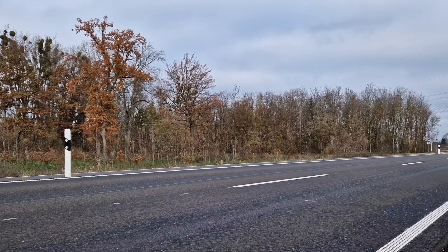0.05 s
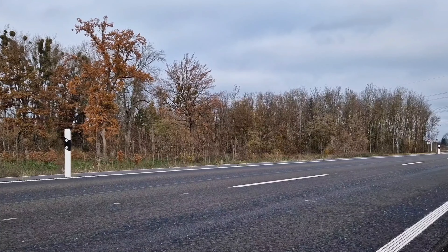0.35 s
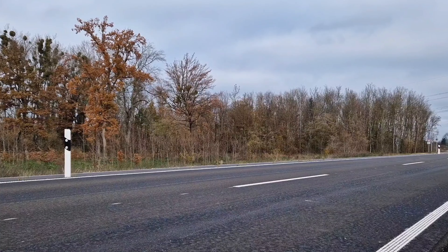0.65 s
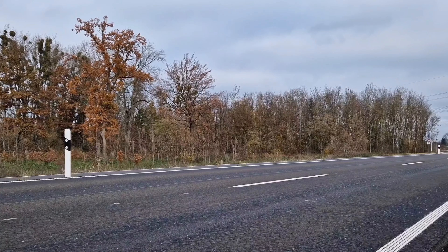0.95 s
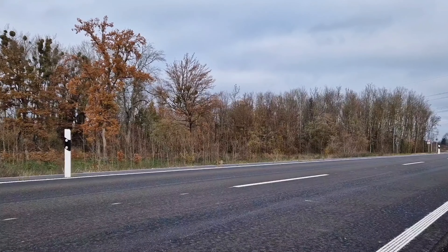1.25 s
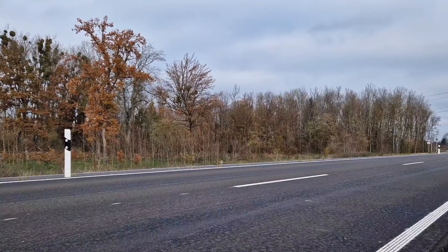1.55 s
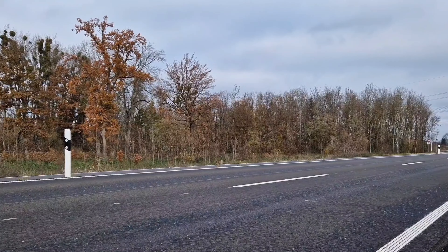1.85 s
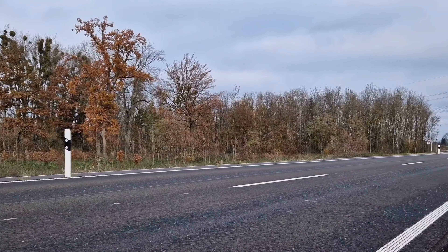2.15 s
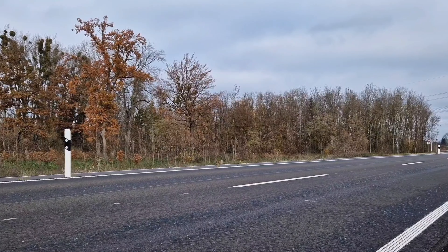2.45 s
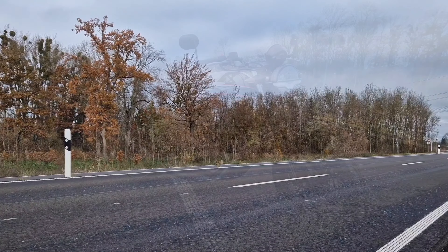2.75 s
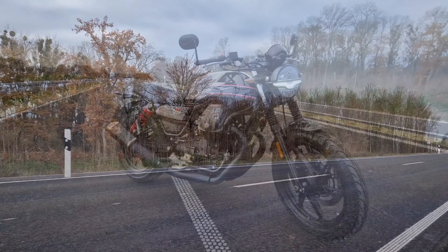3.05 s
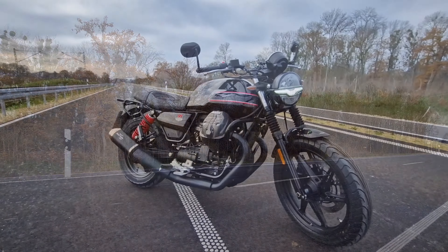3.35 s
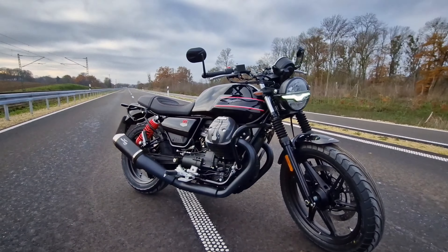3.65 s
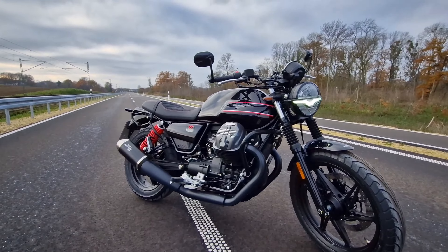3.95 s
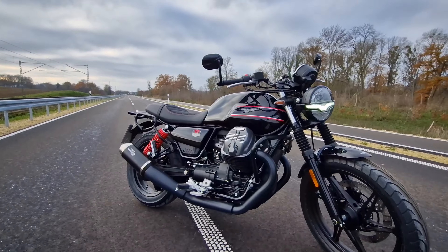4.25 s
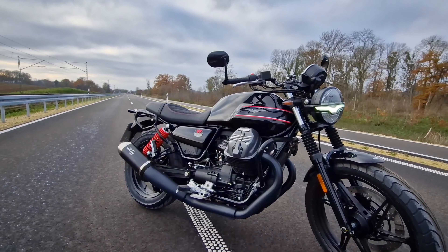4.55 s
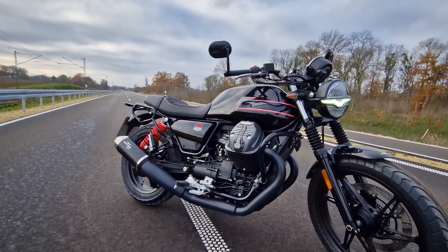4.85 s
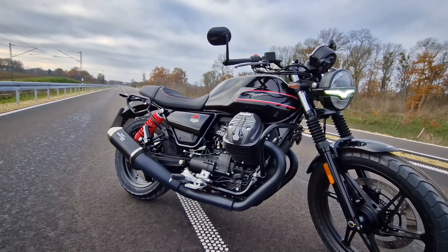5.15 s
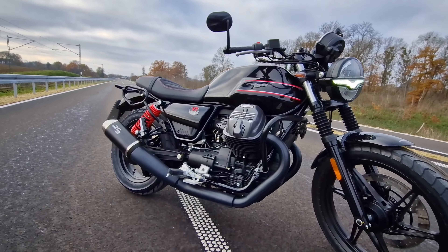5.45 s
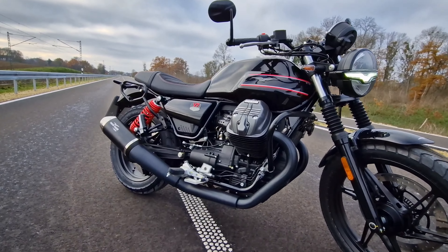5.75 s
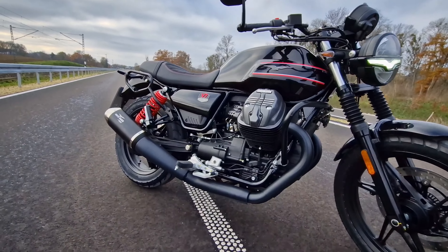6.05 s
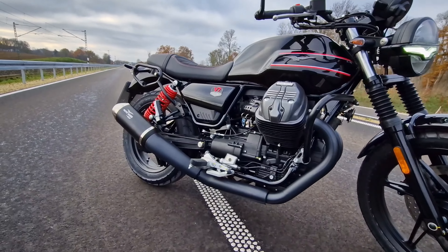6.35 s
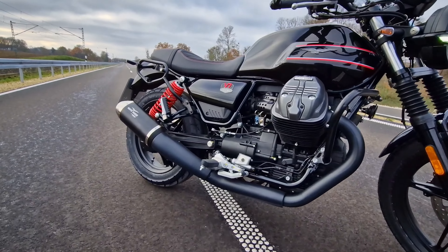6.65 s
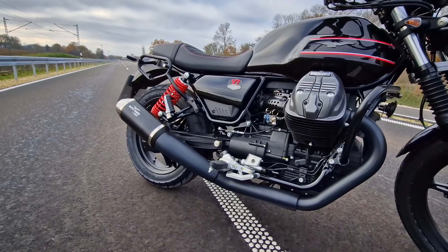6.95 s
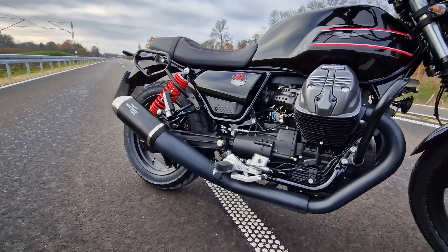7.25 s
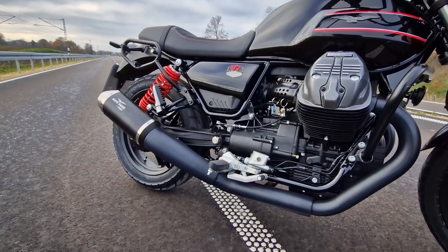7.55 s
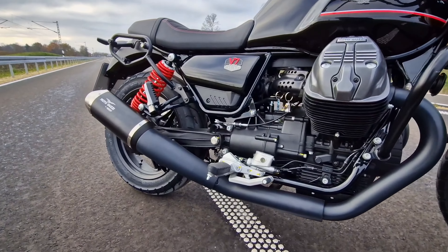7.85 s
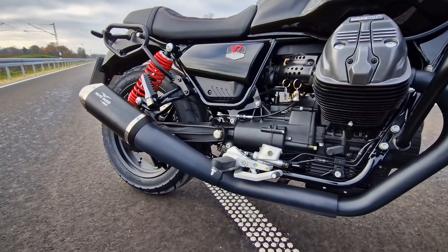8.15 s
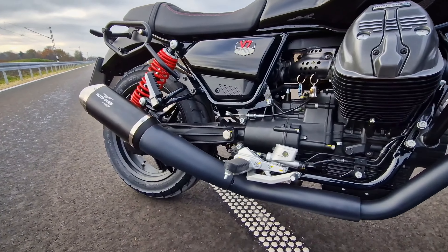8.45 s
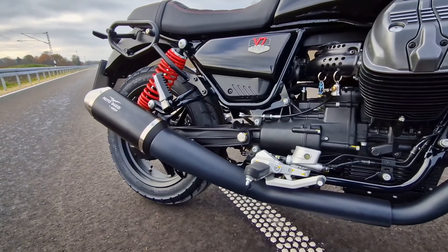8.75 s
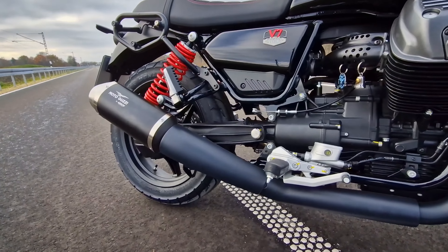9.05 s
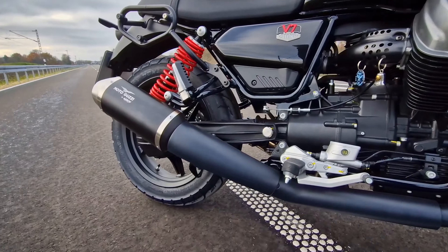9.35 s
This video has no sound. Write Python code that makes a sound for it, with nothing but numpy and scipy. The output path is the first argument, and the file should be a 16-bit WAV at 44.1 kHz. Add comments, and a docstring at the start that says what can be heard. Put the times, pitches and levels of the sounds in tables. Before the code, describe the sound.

A V-twin motorcycle fades down the road, its exhaust popping, then idles unevenly, growing nearer, with ticking valves and a few sharp knocks.

```python
"""A V-twin motorcycle has just passed on an open road. Engine tones and gear whine sink with the revs;
from 0.7 s the exhaust pops, fading into the distance with its burble, tyre rush and valve ticks.
From 3.3 s it idles close by, coming nearer: gas puffs ring the silencer, soon loping strong and weak,
valve and piston strikes ring the engine metal in step with the crank, and a gear whine wavers on top.
A few sharp knocks come near the end."""
import sys
import numpy as np
from scipy import signal
from scipy.fft import rfft, irfft, next_fast_len
from scipy.io import wavfile
from scipy.ndimage import uniform_filter1d

SR = 44100
rng = np.random.default_rng(int(sys.argv[2]) if len(sys.argv) > 2 else 0)


def file_out(sig):
    """Save sig as 16-bit WAV at sys.argv[1]."""
    # one column per channel
    cols = np.atleast_2d(sig).T
    # limit, then scale
    lim = np.clip(cols, -1, 1)
    pcm = np.round(lim * 32767).astype(np.int16)
    wavfile.write(sys.argv[1], SR, pcm)


N = 414099
TIME, HZ = np.arange(N) / SR, np.fft.rfftfreq(next_fast_len(N, real=True), 1 / SR)

# Levels in the tables are relative; each source adds its own offset.
# stereo image of the noise: (frequency [Hz], left-right likeness [0-1])
COHERENCE = [(30, 0.76), (200, 0.6), (550, 0.86), (1100, 0.85), (2200, 0.19), (4500, 0.041), (12000, 0.085)]
# (frequency [Hz], phase lead of the left side [rad])
LEFT_LEAD = [(500, 0), (1000, -1.2), (2200, -0.83), (4500, -7.5), (12000, -13.5)]

# riding away: (time [s], rumble [dB], tyre and engine rush [dB], its treble [dB])
AWAY_LEVELS = [(0, -46, -52.5, -58), (0.77, -56, -60, -76.5), (2.57, -68.5, -77.5, -92.5),
               (3.2, -82, -96, -102)]
# tyre and engine rush: (frequency [Hz], density [dB])
RUSH_SPECTRUM = [(150, -25), (250, 1), (359, -5), (593, -16), (837, -19), (1180, -21.5), (1920, -21.5),
                 (3330, -23.5), (4470, -43), (6210, -41), (7510, -30.5), (9390, -34), (15500, -47.5)]
# engine metal from behind: (frequency [Hz], width [Hz], peak [dB])
FAR_METAL_MODES = [(1180, 140, 3.5), (2650, 460, 1.5), (3350, 270, 2.5), (5500, 1000, 8), (7960, 400, 2)]
# falling revs: (time [s], engine cycle rate [Hz])
COAST_REVS = [(0, 15.8), (.2, 14.9), (.4, 13.2), (.6, 11.5), (.8, 10.3), (1, 9.4), (1.3, 9.5)]
# coasting tones: (order [per cycle], level [dB], fall [dB/s])
ENGINE_ORDERS = [(2, -30, 20), (3, -42, 17), (4, -21.5, 22), (6, -20, 38), (7, -41, 12), (8, -33.5, 25),
                 (10, -40.5, -10.5)]
# burble between the pops: (time [s], level [dB])
BURBLE_LEVEL = [(0, -27.5), (.5, -29.5), (1, -34.5), (1.8, -43), (2.4, -44.5), (2.8, -50), (3.2, -57)]
# exhaust pops: (time [s], level [dB])
POP_LEVELS = [(.72, -27), (.93, -33), (1.03, -22), (1.35, -20.5), (1.95, -24), (2.36, -27), (2.76, -35.5),
              (3.2, -46)]
# missed firing: (time [s], loss [dB])
MISFIRE_LOSS = [(1.8, -0.5), (2.25, 11)]

# idling, coming nearer: (time [s], clatter [dB], its treble [dB], fins [dB], exhaust [dB])
IDLE_LEVELS = [(3.4, -61.5, -63.5, -63.5, -37.5), (3.93, -49.5, -50.5, -50.5, -26),
               (5.29, -40, -42, -40.5, -17), (9.21, -39, -38.5, -40, -17), (9.36, -39.5, -40, -39.5, -17)]
# hunting idle speed: (time [s], engine cycle rate [Hz])
IDLE_RATE = [(3.3, 10.631), (4.3, 10.989), (4.9, 10.726), (5.4, 10.66), (6.2, 11.249), (6.9, 10.867),
             (7.4, 10.662), (7.8, 11.452), (8.7, 10.728), (9.39, 10.67)]
# strong-weak alternation: (time [s], depth [0-1])
LOPE_DEPTH = [(4.2, .3), (5.2, 1)]
# broad colour of the engine: (frequency [Hz], density [dB])
CASE_SPECTRUM = [(310, -5.5), (520, -1), (1070, -5), (1200, -4), (1720, -7), (2630, -6), (3210, -8.5),
                 (3500, -4.5), (3980, -12.5), (14500, -14), (15600, -18.5)]
# crankcase, fins and valve covers: (frequency [Hz], width [Hz], peak [dB])
METAL_MODES = [(710, 41, 4.5), (825, 28, 3.5), (1215, 79, 4), (2370, 68, -2), (2613, 17, 6),
               (2840, 310, 4.5), (3534, 61, 3), (4226, 77, 6), (5715, 140, 6), (7920, 870, 4.5),
               (10160, 74, 2.5), (11434, 130, -1.5)]
# valve and piston strikes: (phase [cycles], level [dB], brightness [dB], decay [s])
CYCLE_STRIKES = [(.02, -6, -7.5, 0.0025), (.16, 3.5, 1.5, 0.0035), (0.261, 5, -10.5, 0.022),
                 (0.699, 0.5, 5, 0.012), (.81, 4.5, -11, .011), (0.929, 3.5, 1.5, 0.0078)]
# gearbox and engine knocks: (time [s], level [dB], centre [Hz], half-width [factor])
KNOCK_EVENTS = [(0.175, -43, 1680, 1.7), (.339, -53, 3300, 1.5), (7.803, -30, 10400, 1.7),
                (8.249, -26, 3470, 0.98), (8.71, -28, 3570, 1.06), (8.797, -22.5, 7000, 2.6)]
# silencer and pipe, before pitch and damping factors: (frequency [Hz], width [Hz], level [dB])
PIPE_MODES = [(78.1, 17, -9), (99.1, 9.17, -1.5), (65.3, 8.6, -8), (166, 76, -11.5)]

POP_START_S, POP_RATE_HZ = .724, 9.8
LATE_BURN_S = 0.0113  # delay of the charge that burns in the pipe


def gain_of(db):
    """Decibels to amplitude."""
    return 10 ** (np.asarray(db) / 20)


def unit_rms(x):
    """Scale to rms 1."""
    return x / np.sqrt(np.mean(x ** 2) + 1e-20)


def spectrum(points):
    """A spectrum table at every frequency."""
    hz, value = np.transpose(points)
    return np.interp(np.log(HZ + 1), np.log(hz + 1), value)


def curves(rows):
    """The columns of a time table at every sample."""
    s, *columns = np.transpose(rows)
    return [np.interp(TIME, s, c) for c in columns]


def at_times(points, s):
    """A two-column time table at the given moments."""
    return np.interp(s, *np.transpose(points))


def drift(hz):
    """Slow random wander up to the given rate, rms 1."""
    count = N // 64
    lowpass = 1 + (np.fft.rfftfreq(count, TIME[-1] / count) / hz) ** 4
    slow = irfft(rfft(rng.standard_normal(count)) / lowpass, count)
    return np.interp(TIME, np.linspace(0, TIME[-1], count), unit_rms(slow))


def clicks(s, size):
    """Impulse train."""
    return np.bincount(np.clip(np.round(s * SR).astype(int), 0, N - 1), size, N)


def bursts(s, size, decay_s):
    """Power envelope: instant attack, exponential decay."""
    return signal.lfilter([1], [1, -np.exp(-2 / (decay_s * SR))], clicks(s, size ** 2))


def band(lo_hz, hi_hz):
    """Gain of a steep high-pass times a steep low-pass."""
    return 1 / np.sqrt((1 + (lo_hz / (HZ + 1)) ** 12) * (1 + (HZ / hi_hz) ** 12))


def peaks_db(modes):
    """Resonance peaks at every frequency."""
    return sum(db / (1 + (2 * (HZ - hz) / width_hz) ** 2) for hz, width_hz, db in modes)


def ripple(spacing_hz, depth_db):
    """Gain of many small, close casing modes."""
    grid = np.arange(0, SR, spacing_hz)
    return gain_of(depth_db * np.interp(HZ, grid, rng.standard_normal(SR)[:len(grid)]))


def hiss(colour, gate=1):
    """Stereo noise, gated, then coloured; rms 1."""
    size = next_fast_len(N, real=True)
    white = rng.standard_normal((2, N), dtype=np.float32)
    left, other = rfft((white * gate).astype(np.float32), size)
    same = np.clip(spectrum(COHERENCE), 0, 1)
    right = (same * left + np.sqrt(1 - same ** 2) * other) * np.exp(-1j * spectrum(LEFT_LEAD))
    return unit_rms(irfft(np.array([left, right]) * colour, size)[:, :N])


def shimmer(x, depth_db):
    """Each rattle favours other modes: narrow patches of the spectrum swell and fade."""
    frames = signal.stft(x, nperseg=512, noverlap=384)[2]
    patches = uniform_filter1d(rng.standard_normal(frames.shape[1:]), size=3, axis=0)
    patches = unit_rms(uniform_filter1d(patches, size=8, axis=1))
    gain = unit_rms(gain_of(depth_db * np.minimum(patches, 2)))
    return signal.istft(frames * gain, nperseg=512, noverlap=384)[1][:, :N]


def ground_echo(x, delay_s, share):
    """The asphalt returns a copy whose delay changes with distance."""
    echo = np.array([np.interp(TIME - delay_s, TIME, side) for side in x])
    return (x + share * echo) / np.sqrt(1 + share ** 2)


def road(pop_s, pop_db, lazy):
    """Tyre rush, engine rasp and rumble, dulled by distance; a light tick at each crisp pop."""
    rumble_db, rush_db, treble_db = curves(AWAY_LEVELS)
    rate_hz, = curves(COAST_REVS)
    rasp = gain_of(1.5 * np.sin(8 * np.pi * np.cumsum(rate_hz) / SR) + 1.1 * drift(70))
    colour = gain_of(spectrum(RUSH_SPECTRUM) + peaks_db(FAR_METAL_MODES))
    dulled_db = np.interp(TIME, [1.2, 2], [-4, -10])
    rush = (gain_of(rumble_db - 3) * hiss(colour * band(170, 850))
            + gain_of(rush_db - 1.5) * hiss(colour * band(580, 2870), rasp)
            + gain_of(rush_db + dulled_db) * hiss(colour * band(3000, 5000), rasp)
            + gain_of(treble_db + 2.5) * hiss(colour * band(4400, 16000), rasp))
    tick_power = bursts(pop_s + 0.0014, gain_of(0.62 * pop_db - 49 - 10 * lazy), decay_s=0.0096)
    ticks = np.sqrt(tick_power) * hiss(band(700, 3000) + band(5600, 6800) ** 3)
    rush = shimmer(ground_echo(rush, 0.000434 / (1 + 1.07 * TIME), share=0.18), depth_db=2.5)
    return rush + ticks + gain_of(rumble_db + 8.5) * hiss(band(16, 91))


def far_chatter():
    """The receding valve gear ticks unevenly in two bands of ringing metal."""
    cycle = np.arange(3, 24)
    s = np.concatenate([POP_START_S + (cycle + phase) / POP_RATE_HZ for phase, *_ in CYCLE_STRIKES])
    db = at_times(POP_LEVELS, s)[:, None] + 3.5 * rng.standard_normal((len(s), 2))
    fins = np.sqrt(bursts(s, gain_of(db[:, 0] - 50), decay_s=.016)) * hiss(band(2350, 2500))
    covers = np.sqrt(bursts(s, gain_of(db[:, 1] - 51), decay_s=.009)) * hiss(band(5500, 4600) ** 2)
    return fins + covers


def knocks():
    """Short clacks and pings of gearbox and engine."""
    return sum(np.sqrt(bursts(np.array([s]), gain_of([db]), decay_s=0.0081))
               * hiss(band(hz / wide, hz * wide)) for s, db, hz, wide in KNOCK_EVENTS)


def coasting_engine():
    """Engine orders and gear whine sink with the revs, gone by 1.2 s."""
    rate_hz, = curves(COAST_REVS)
    cycles = np.cumsum(rate_hz * (1 + 0.0084 * drift(18))) / SR
    tones = sum(gain_of(db - fall * TIME + 2 * drift(2.5))
                * np.sin(2 * np.pi * (order * cycles + rng.random()))
                for order, db, fall in ENGINE_ORDERS)
    whine_db = -58 - 2.4 * TIME + 2 * drift(25)
    whine = gain_of(whine_db) * np.sin(2 * np.pi * (41.5 * cycles + 0.11 * drift(30)))
    return (tones + whine) * np.interp(TIME, [.95, 1.2], [1, 0])


def silencer(train, pitch, puff_s, damping, highpass_hz):
    """Each gas puff rings the pipe modes; pitch < 1 lowers and slows the response."""
    t = np.arange(SR // 3) / SR * pitch
    ring = sum(gain_of(db) * np.exp(-np.pi * width_hz * damping * t) * np.cos(2 * np.pi * hz * t)
               for hz, width_hz, db in PIPE_MODES)
    thump = signal.fftconvolve(ring, t * np.exp(-t / puff_s))[:len(t)]
    thump = signal.sosfilt(signal.butter(2, highpass_hz, "high", fs=SR, output="sos"), thump)
    return -signal.oaconvolve(train, thump / abs(thump).max())[:N]


def burble():
    """Two exhaust strokes a cycle ring the receding silencer, Doppler-lowered."""
    level_db, = curves(BURBLE_LEVEL)
    stroke_s = POP_START_S + np.arange(-14, 49) / (2 * POP_RATE_HZ)
    stroke_s += .004 * rng.standard_normal(len(stroke_s))
    puffs = clicks(stroke_s, np.ones(len(stroke_s)))
    ring = silencer(puffs, pitch=0.953, puff_s=0.0015, damping=0.98, highpass_hz=22.5)
    return gain_of(level_db + 4) * ring


def pop_timing(second_s=.037, second_db=-1):
    """Pop times, levels, laziness (0/1): cylinders miss in turn; the first is crisp in even cycles."""
    cycle = np.arange(24)
    odd = cycle % 2
    first_s = POP_START_S + cycle / POP_RATE_HZ
    s = np.concatenate([first_s, first_s + second_s])
    loss_db = np.concatenate([odd, 1 - odd]) * at_times(MISFIRE_LOSS, s)
    lazy = np.concatenate([odd, np.ones(len(cycle))])
    jitter, strength = rng.standard_normal((len(s), 2)).T
    db = at_times(POP_LEVELS, s) - loss_db + np.repeat([0, second_db], len(cycle))
    return s + 0.0014 * jitter, db + 1.9 * strength, lazy


def exhaust_pops(pop_s, pop_db, lazy):
    """Pops ring the receding silencer; part of a lazy pop burns late."""
    size, late_share = gain_of(pop_db), .4 * lazy
    puffs = clicks(pop_s, size * (1 - late_share)) + clicks(pop_s + LATE_BURN_S, size * late_share)
    rounded = uniform_filter1d(puffs, size=70)
    return silencer(rounded, pitch=0.96, puff_s=0.0038, damping=2.1, highpass_hz=73)


def idle_timing(start_s=3.3048, strong_late_share=.096, weak_late_share=.49):
    """Beat times and late-burning shares: every other beat is weak and slightly early."""
    rate_hz, = curves(IDLE_RATE)
    cycles = np.cumsum(rate_hz) / SR
    cycles -= np.interp(start_s, TIME, cycles)
    beat = np.arange(67)
    beat_s = np.interp(beat, cycles, TIME)
    weak = (1 - beat % 2) * at_times(LOPE_DEPTH, beat_s)
    jitter, burn = rng.standard_normal((len(beat), 2)).T
    late_share = strong_late_share + (weak_late_share - strong_late_share) * weak + .11 * burn
    return beat_s - .002 * (weak - .5) + .0018 * jitter, np.clip(late_share, .02, .85)


def gear_whine(beat_s, mesh_order=38.6, db_per_hz=2.5):
    """Gear tone locked to the crank, which speeds up after each beat and slows; higher revs are louder."""
    rate_hz, = curves(IDLE_RATE)
    cycles = np.interp(TIME, beat_s, np.arange(len(beat_s)))
    speed_hz = rate_hz * (1 + .028 * np.sin(2 * np.pi * (cycles - .2)) + 0.016 * drift(13.62))
    clatter_db = curves(IDLE_LEVELS)[0]
    approach_db = clatter_db + .33 * (clatter_db - clatter_db.max())
    db = approach_db - 1.5 + db_per_hz * (rate_hz - np.median(rate_hz)) + 4.4 * drift(39)
    return gain_of(db) * np.sin(2 * np.pi * mesh_order * np.cumsum(speed_hz) / SR)


def tappets(beat_s):
    """Sharp valve taps, each ringing the metal modes in a different mix."""
    tap_s = np.concatenate([beat_s + phase / at_times(IDLE_RATE, beat_s) for phase, *_ in CYCLE_STRIKES])
    tap_s += .001 * rng.standard_normal(len(tap_s))
    t, ringing = np.arange(SR // 25) / SR, np.zeros((2, N))
    for hz, width_hz, db in METAL_MODES:
        size = gain_of(db - 0.57 * np.log2(hz / 1000)) * np.sqrt(width_hz)
        ring = size * np.exp(-np.pi * .6 * width_hz * t) * np.sin(2 * np.pi * hz * t)
        taps = np.array([clicks(tap_s, side) for side in rng.uniform(-1.03, 1, (2, len(tap_s)))])
        ringing += signal.oaconvolve(taps, ring[None])[:, :N]
    return gain_of(curves(IDLE_LEVELS)[0] - 11) * unit_rms(ringing)


def engine_clatter(beat_s, tick_rate_hz=300):
    """Valve and piston strikes and small chain and gear ticks ring the metal, over a low rumble."""
    period_s = 1 / at_times(IDLE_RATE, beat_s)
    body_db, treble_db, fins_db, _ = curves(IDLE_LEVELS)
    clatter = gain_of(body_db + 4) * hiss(band(24, 94) / np.sqrt(HZ + 20))
    colour = gain_of(spectrum(CASE_SPECTRUM) + peaks_db(METAL_MODES)) * ripple(45, depth_db=2)
    jitter_s = 0.0025 * rng.standard_normal((len(CYCLE_STRIKES), len(beat_s)))
    crankcase = (202, 1980, body_db + 1.34, 0.12)
    fins = (1940, 4850, fins_db + 2.5, 0.64)
    covers = (4600, 17800, treble_db + 2.5, 0.8)
    for lo_hz, hi_hz, level_db, bright_share in (crankcase, fins, covers):
        ticks = (rng.random(N) < tick_rate_hz / SR) * gain_of(rng.uniform(-6, 0, N))
        power = bursts(TIME, ticks, decay_s=0.0054) + .5
        for (phase, db, bright_db, decay_s), late_s in zip(CYCLE_STRIKES, jitter_s):
            size = gain_of(db + bright_share * bright_db + rng.uniform(-6.5, 5.3, len(beat_s)))
            power += bursts(beat_s + phase * period_s + late_s, size, decay_s)
        gate = np.sqrt(abs(uniform_filter1d(power, size=90)))
        clatter += gain_of(level_db) * hiss(colour * band(lo_hz, hi_hz), gate)
    return ground_echo(clatter, np.interp(TIME, [3.3, 9.39], [.0016, .0032]), share=0.056)


def idle_exhaust(beat_s, late_share, second_phase=0.3935, late_loss_db=3.5):
    """Both firings, late burn and piston push ring the silencer; slow burns puff rounder, sharp ones hiss."""
    exhaust_db = np.interp(beat_s, TIME, curves(IDLE_LEVELS)[3])
    charge = gain_of(exhaust_db + 10 - late_loss_db * (late_share - late_share.mean()))
    period_s = 1 / at_times(IDLE_RATE, beat_s)
    second_jitter, second_force, push_jitter, push_force = rng.standard_normal((len(beat_s), 4)).T
    first = charge * (1 - late_share)
    sharp = first * (1 - 0.69 * late_share)
    second_s = beat_s + second_phase * period_s + 0.012 * late_share + 0.0033 * second_jitter
    soft = (clicks(beat_s, first - sharp)
            + clicks(beat_s + LATE_BURN_S, charge * late_share)
            + clicks(second_s, charge * gain_of(-8.5 + 5 * np.minimum(second_force, 1)))
            + clicks(beat_s + .068 + 0.0019 * push_jitter, charge * gain_of(-12.5 + 2 * push_force)))
    sharp_puffs = clicks(beat_s, sharp) * gain_of(1)
    soft_puffs = uniform_filter1d(soft, size=90) * gain_of(2.5)
    thumps = (silencer(sharp_puffs, pitch=0.944, puff_s=0.00094, damping=0.87, highpass_hz=21)
              + silencer(soft_puffs, pitch=0.94, puff_s=0.0012, damping=0.87, highpass_hz=17.5))
    gas_power = bursts(beat_s + 0.0023, sharp * gain_of(-24), decay_s=0.0074)
    gas_colour = gain_of(spectrum(CASE_SPECTRUM)) * band(1800, 20000) * np.sqrt(HZ)
    return thumps + np.sqrt(gas_power) * hiss(gas_colour)


def scene():
    """The ride fades out, the idle fades in."""
    fade_out = np.interp(TIME, [3.12, 3.24], [1, 0])
    fade_in = np.interp(TIME, [3.25, 3.4], [0, 1])
    pops = pop_timing()
    beat_s, late_share = idle_timing()
    engine = shimmer(engine_clatter(beat_s) + tappets(beat_s), depth_db=2) + gear_whine(beat_s)
    ride = coasting_engine() + burble() + exhaust_pops(*pops) + road(*pops) + far_chatter()
    return fade_out * ride + knocks() + fade_in * (engine + idle_exhaust(beat_s, late_share))


def record(dry):
    """Left side slightly louder; low-pass at 15750 Hz."""
    lowpass = signal.firwin(511, 15750, window=("kaiser", 9), fs=SR)
    return signal.oaconvolve(dry * gain_of([[.2], [-.2]]), lowpass[None], "same")


dry = scene()
out = record(dry)
file_out(out)
```